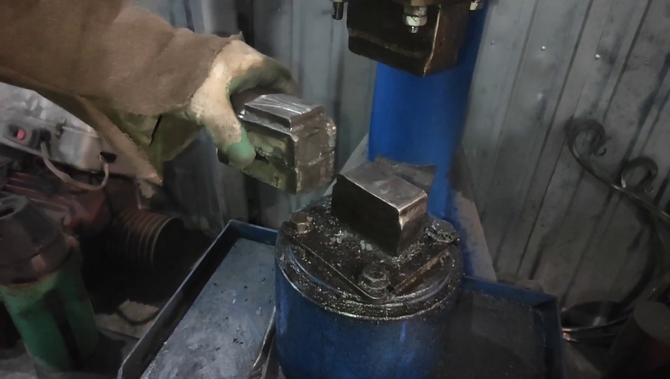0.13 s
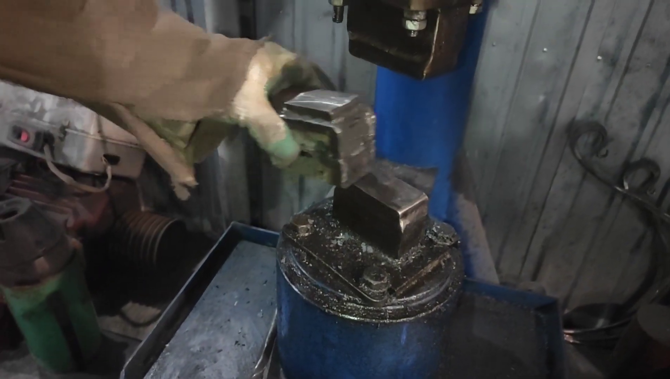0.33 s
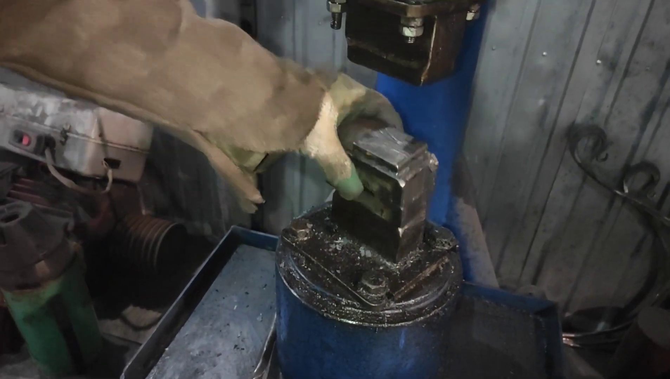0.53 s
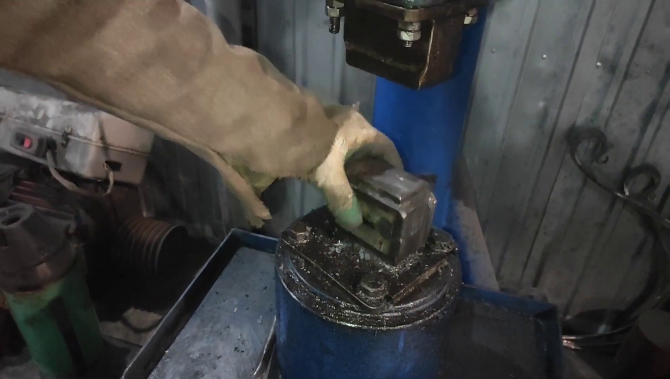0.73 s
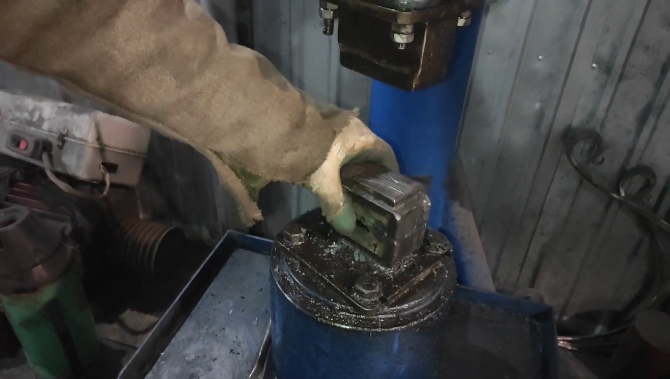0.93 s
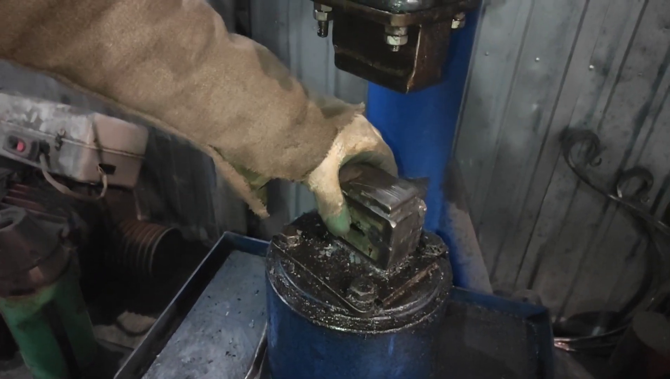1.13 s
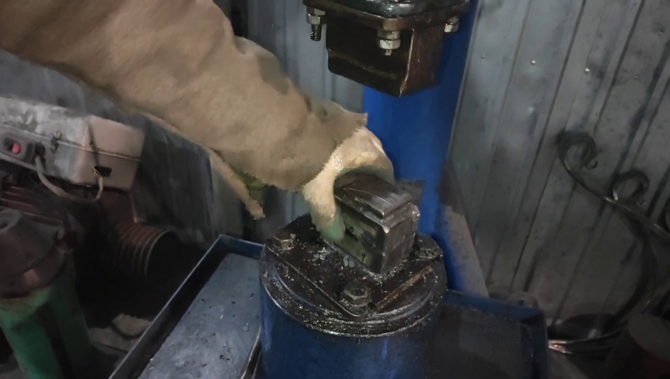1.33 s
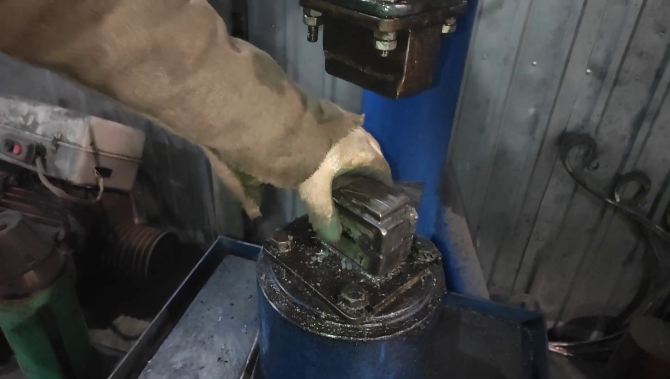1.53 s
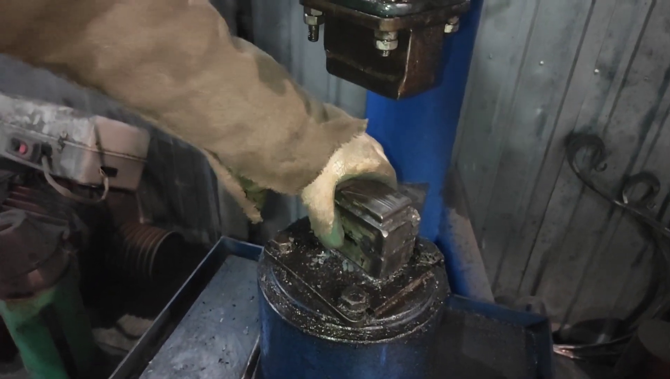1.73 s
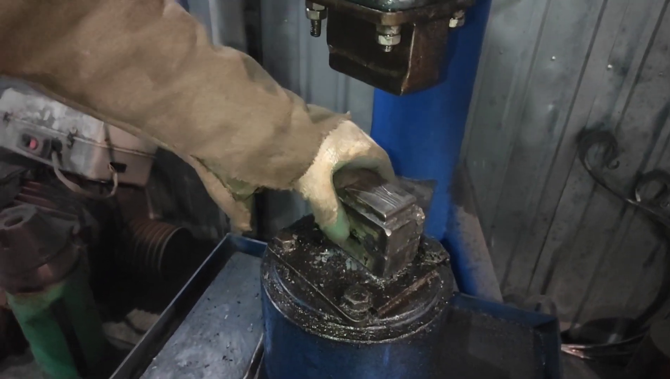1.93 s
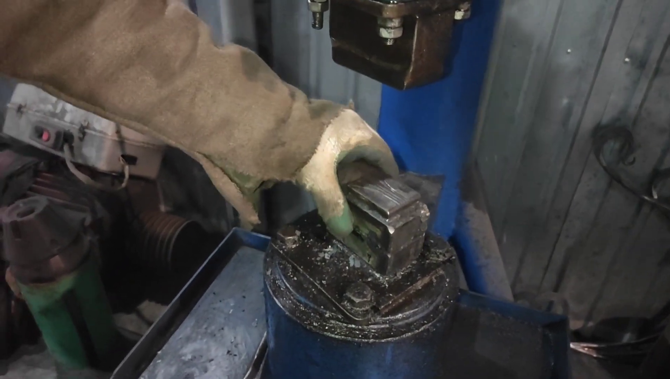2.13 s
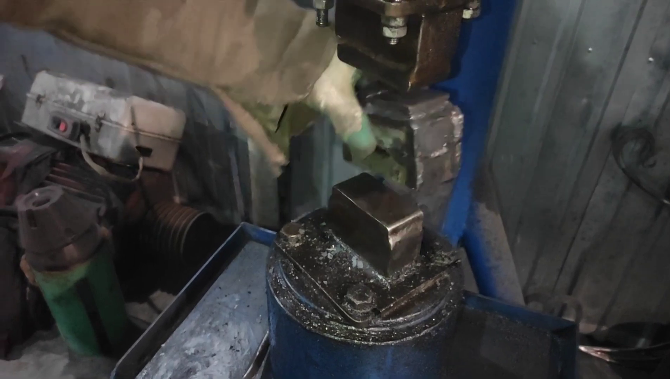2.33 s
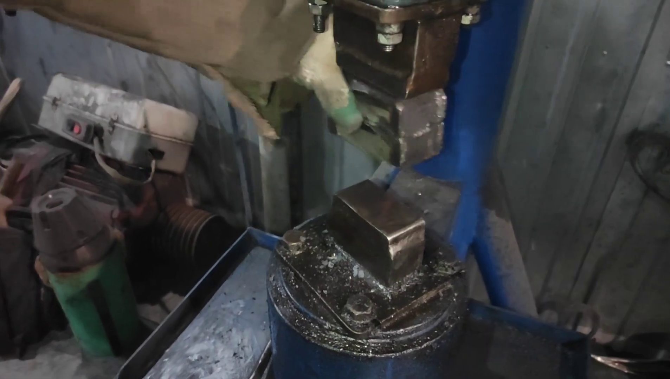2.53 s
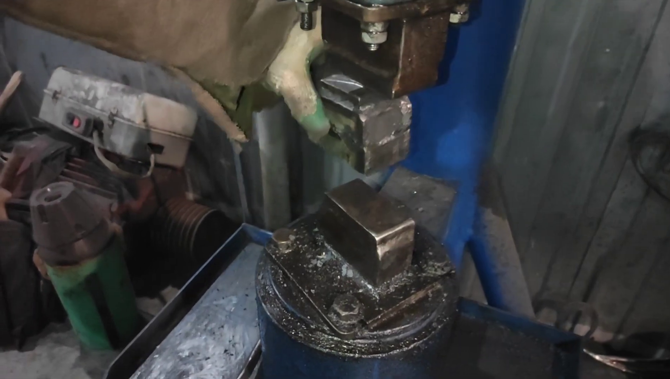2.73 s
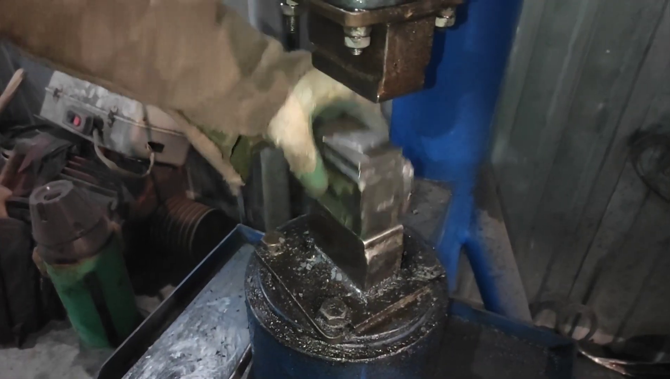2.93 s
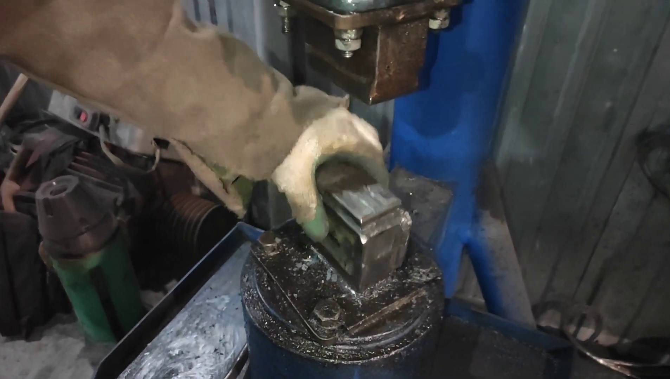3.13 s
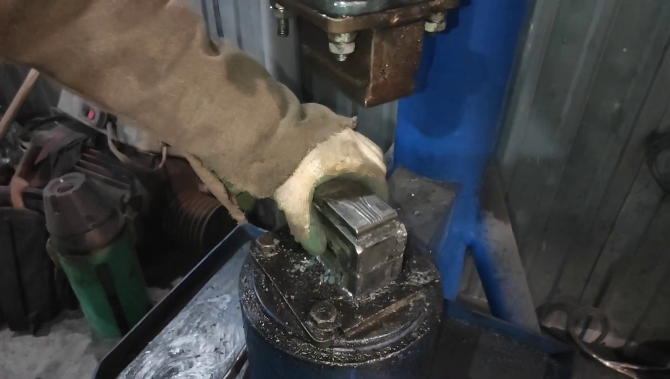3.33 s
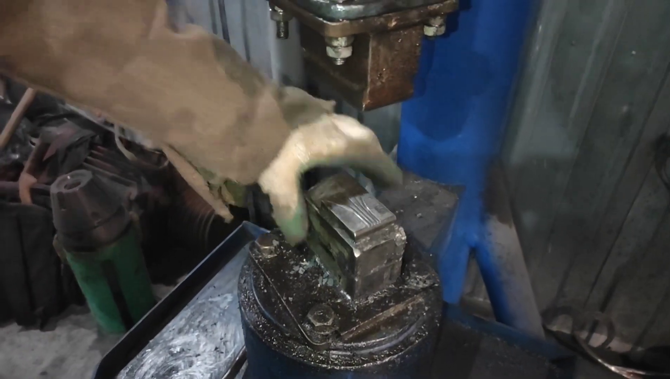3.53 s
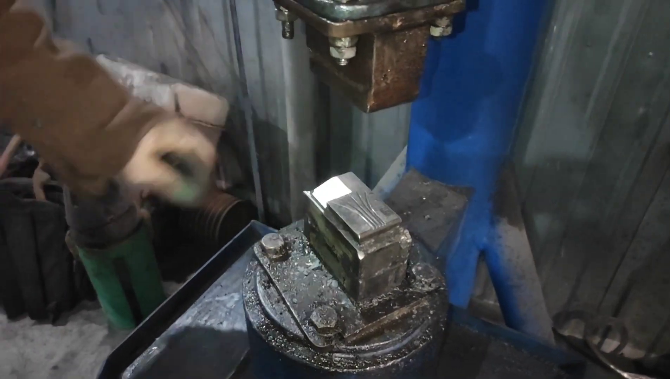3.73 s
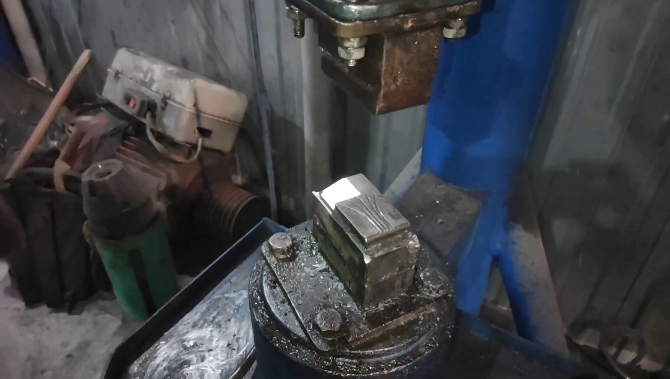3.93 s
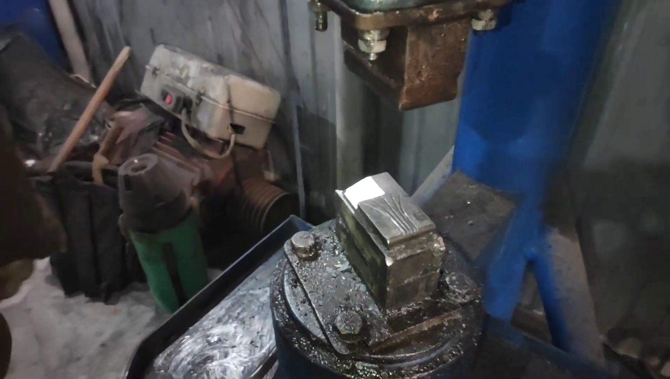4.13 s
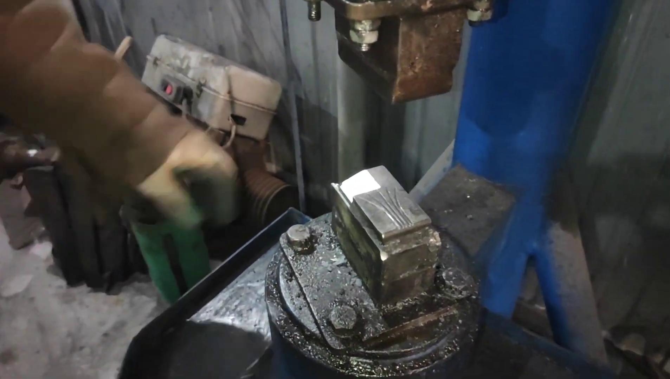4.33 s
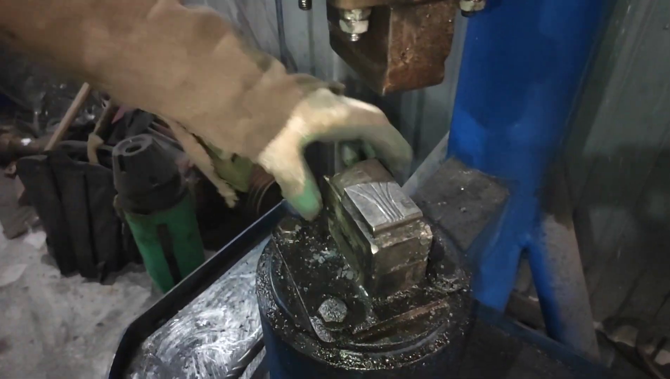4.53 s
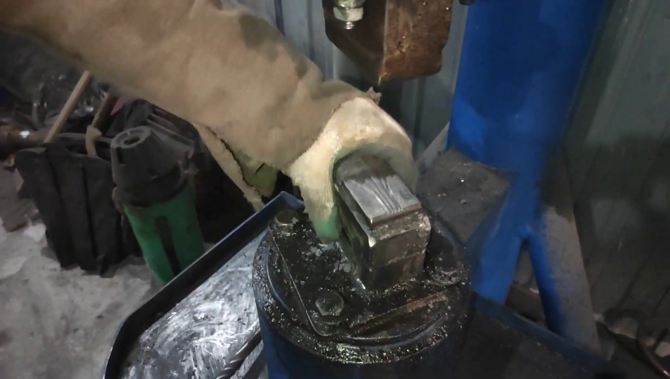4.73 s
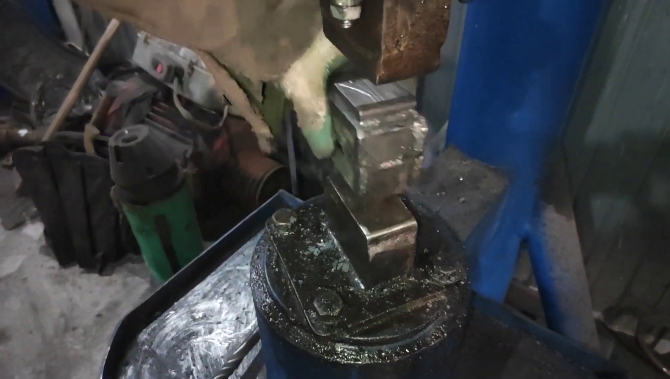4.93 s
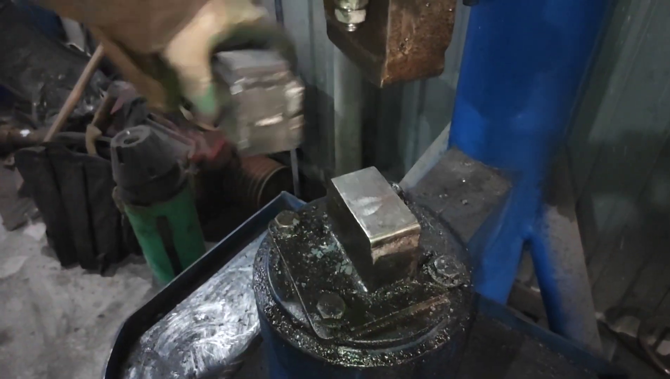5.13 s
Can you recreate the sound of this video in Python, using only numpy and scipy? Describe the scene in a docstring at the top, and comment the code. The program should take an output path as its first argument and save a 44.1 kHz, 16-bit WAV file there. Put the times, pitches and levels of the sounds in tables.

```python
"""Steel block on a forging die

A gloved hand sets a heavy steel block on the die of a forging hammer, shifts it, drags it off, sets it
down again with three clanks and pulls it away. Knocks and clanks are decaying modes of block, anvil and
die; slides pass bursts of tiny catches through those of block and anvil. Light ticks, some perhaps from
clothes or shoes, fall between. A sheet-metal workshop answers with decaying noise, over a faint wavering
hum, a low rumble and the filtered noise of a sleeve and a glove."""
import sys
import numpy as np
from scipy import signal
from scipy.fft import rfft, irfft
from scipy.io import wavfile
from scipy.ndimage import uniform_filter1d, minimum_filter1d

SR = 44100
rng = np.random.default_rng(int(sys.argv[2]) if len(sys.argv) > 2 else 0)


def inscribe(sig):
    """Save sig as 16-bit PCM at rate SR to the path in sys.argv[1].

    A 1-D sig is mono; a 2-D sig holds one channel per row.
    Samples are clipped to [-1, 1] before scaling.
    """
    pcm = np.round(np.clip(np.atleast_2d(sig).T, -1, 1) * 32767)
    wavfile.write(sys.argv[1], SR, pcm.astype(np.int16))


N = 228471
RING_SIZE = 2 ** 14  # samples that one ring lasts

# Low rumble of the shop. Each row: frequency in Hz, relative level in dB.
SHOP_SPECTRUM = [(25, 1.5), (60, -11.5), (130, -8), (200, -3), (300, -12.5), (600, -16), (1000, -21),
                 (1600, -25), (3500, -32.5), (5000, -30), (6800, -26.5), (9000, -31), (15000, -45.5)]
# Hum that fades and comes back. Each row: time in seconds, level in dB.
HUM_LEVEL = [(0, -59), (1.3, -69), (1.65, -77.5), (3.8, -78), (4.8, -64), (5.18, -91)]
HUM_HZ = 188.4  # mean pitch
# Rustle of the sleeve over time. Each row: time in seconds, level in dB.
SLEEVE_LEVEL = [(0, -107), (.6, -79.5), (1.45, -66.5), (2.75, -74), (3.65, -63), (4.7, -66.5), (5.18, -71)]
# Spectrum of the sleeve. Each row: frequency in Hz, relative level in dB.
CLOTH_SPECTRUM = [(100, -5), (400, 4.5), (900, -4.5), (2000, 1), (3700, -10), (5000, -6.5), (6900, 1.5),
                  (8600, -6.5), (10500, -20), (15000, -39)]
# Spectrum of the glove. Each row: frequency in Hz, relative level in dB.
GLOVE_SPECTRUM = [(300, -14), (1800, -6.5), (4000, -10.5), (6000, -7.5), (7500, 0), (10000, 3),
                  (15000, -43)]
# The glove tightens on the block. Each row: start in seconds, length in seconds, starting level in dB.
GRIPS = [(1.935, 0.13, -59.5), (4.732, 0.13, -46)]
GRIP_FADE_DB = 14  # the brushing dies down as the fingers come to rest
# Decay of the workshop. Each row: frequency in Hz, t60 in seconds.
ROOM_T60 = [(100, 0.27), (400, 0.84), (900, 0.61), (2000, 0.64), (4000, 0.57), (7500, 0.23), (14000, 0.47)]
# Colour of the reverberant sound. Each row: frequency in Hz, relative level in dB.
ROOM_COLOUR = [(100, 2.5), (200, 12.5), (450, -3), (900, -0.5), (1500, -4.5), (2400, -1.5), (3300, -4.5),
               (4500, -3.5), (7500, -3), (14000, -4)]

# Modes of the block. Each row: frequency in Hz, relative level in dB, t60 in seconds.
BLOCK_MODES = [(1316, -8, 0.045), (1410, -4.5, 0.09), (1673, -14.5, 0.05), (1730, -11.5, 0.065),
               (1824, -3.5, 0.066), (1945, -10.5, .05), (2056, -13, 0.05), (2203, -16.5, 0.098),
               (2420, -17, 0.2), (3584, -11.5, 0.035), (3670, -10.5, 0.079), (4266, -10.5, 0.04),
               (4430, -10.5, 0.04), (4900, -18.5, 0.051), (5260, -14.5, 0.05), (6810, -15.5, 0.035),
               (6970, -16, 0.045), (7740, -16, 0.05), (8130, -11.5, 0.042)]
# Modes of the anvil. Each row: frequency in Hz, relative level in dB, t60 in seconds.
ANVIL_MODES = [(359.6, -18, 0.15), (437, -17, 0.13), (504, -18, 0.036), (585.8, -17, 0.33),
               (795, -16.5, 0.029), (885, -12.5, 0.11), (1030, -6.5, 0.33), (1110, -16.5, 0.05),
               (1145, -18.5, 0.12)]
# Modes of the die with the block seated on it. Each row: frequency in Hz, relative level in dB,
# t60 in seconds.
DIE_MODES = [(912, 2, .28), (930, -6.5, .15), (1008, -4, 0.27), (1136, -6.5, .18), (1760, -8, 0.22),
             (1980, -10, 0.23), (2173, -4.5, 0.29), (2427, 0, 0.25), (2597, -8, 0.17), (4038, -10.5, .1),
             (4700, -4.5, 0.11), (5300, -6, 0.071), (7230, -8.5, .05)]
# Heavily damped modes while two faces press together. Each row: ratio to the pitch of the knock,
# relative level in dB, t60 in seconds.
KNOCK_MODES = [(0.84, -6, 0.016), (0.999, 1, 0.017), (1.17, -7, 0.013)]
# Spectrum of the clatter of clamped steel. Each row: frequency in Hz, relative level in dB.
CLATTER_SPECTRUM = [(60, -34), (150, -14.5), (260, -26), (420, -5.5), (640, -13.5), (900, 3), (1500, 0.5),
                    (2350, -1.5), (3100, -5), (3650, -1.5), (4050, -6), (4600, -4.5), (5200, -4.5),
                    (6000, -10), (7300, 0.5), (8600, -10), (10000, -21.5), (15000, -39.5)]
# Spectrum of gritty slip. Each row: frequency in Hz, relative level in dB.
GRIT_SPECTRUM = [(80, -26), (250, -39.5), (750, -14.5), (1800, -12), (2700, -12.5), (3200, -9.5),
                 (3600, -4.5), (4000, -19.5), (4400, 2.5), (4850, -3), (5250, 0.5), (5900, -9), (6900, 2),
                 (8300, -3), (10000, -14), (14000, -28.5)]
# Spectrum of low grinding. Each row: frequency in Hz, relative level in dB.
GRIND_SPECTRUM = [(40, -23), (130, -5), (200, 2), (280, -3), (470, 2), (620, -7.5), (820, -1.5),
                  (1050, 5.5), (1300, -4.5), (2500, -11.5), (6000, -21.5)]

# Dull, soft bumps. Each row: start in seconds, relative level in dB, pitch in Hz, t60 in seconds,
# relative width of the resonance.
BUMPS = [(0.903, -48.5, 213, 0.12, 0.26), (1.244, -53.5, 194, 0.046, 0.14), (1.328, -51.5, 232, 0.18, 0.91),
         (1.402, -48.5, 1130, 0.08, 0.057), (3.112, -47, 215, 0.14, 0.35), (3.873, -58.5, 412, 0.054, 0.2),
         (4.198, -60, 81, 0.17, 0.2)]
# Tiny squeaks as the block is nudged. Each row: start in seconds, length in seconds, mean pitch in Hz,
# level in dB.
SQUEAKS = [(1.304, 0.016, 5350, -52), (1.321, 0.0081, 3630, -52), (1.322, .008, 6730, -50),
           (1.375, .015, 3600, -55), (1.381, 0.014, 4380, -46)]
# Pushes that slip the block over the die. Each row: start in seconds, length in seconds, relative level
# at full speed in dB, weight on the die in dB, ring of the block in dB.
SLIDES = [(0.762, 0.13, -35, 1, -1), (0.87, 0.05, -28.5, -3, -4), (1.197, 0.044, -41, 1, -2),
          (1.294, 0.046, -46, 1, -17), (1.367, 0.041, -38, -4, -2.5), (1.389, 0.13, -53.5, -1, -23),
          (1.681, 0.12, -55.5, 3, 1.5), (2.152, 0.047, -54, 0.5, -8), (2.326, 0.051, -34.5, 5, -3),
          (2.364, 0.051, -27.5, -5, -2), (3.156, 0.093, -29, -7.5, -9.5), (3.24, 0.086, -32, -5, -4),
          (4.874, 0.061, -33, 0.5, -5), (4.927, 0.034, -27, -4, -2.5), (4.951, 0.036, -27.5, -8, -0.5),
          (4.972, 0.051, -36.5, -13, 1.5)]
GATHER_DB = 5  # a slide grows this much louder as it gathers speed
GRIND_LAG_S = 0.013  # the low grinding sets in after the grit
# burrs that catch and snap free among the fine grit; the rate is one over the median interval
SNAG_PER_S, SNAG_DB, SNAG_SCATTER_DB = 260, -9, -0.5
# A corner snaps off an edge. Each row: start in seconds, relative level in dB.
SNAPS = [(.839, -25), (0.845, -24.5), (1.23, -26), (1.306, -38), (1.3939, -29.5), (2.292, -31.5),
         (2.43, -15.5), (4.978, -28.5)]
# Light ticks and taps, some perhaps from clothes or shoes. Each row: start in seconds, relative level
# in dB, treble cut-off in Hz.
TICKS = [(1.229, -45, 9420), (1.432, -38, 9000), (1.91, -49, 2000), (2.527, -37, 15600),
         (2.713, -42.5, 3000), (2.834, -47, 4840), (2.934, -51, 3000), (2.998, -43.5, 9000),
         (3.822, -42.5, 2540), (3.967, -36.5, 2040), (4.093, -45, 2603), (4.201, -41.5, 2470),
         (4.254, -42, 2846), (4.434, -43.5, 4520), (4.587, -42.5, 4540), (5.011, -35, 8070)]
TICK_T60_S, TICK_RISE_S = 0.15, 0.00044
# Knocks and clanks of the block, with one likely early echo at 3.32 s. Each row: start in seconds,
# relative level in dB, treble cut-off in Hz, t60 of the clatter in seconds, pitch of the knock in Hz,
# level of the knock in dB, ring of the block in dB, ring of the anvil in dB, ring of the die in dB,
# left minus right in dB.
CLANKS = [(0.6854, -3.5, 3000, 0.16, 1370, -1, 4, -5, -26, -1.5),
          (0.7013, -4.5, 2000, 0.16, 932, -1, 4, -3.5, -22, 3.5),
          (0.759, -17, 1500, .07, 950, -1, -0.5, -10, -22, -0.5),
          (0.774, -20, 2200, .07, 1400, -12, 5, -10.5, -7.5, -2),
          (0.8225, -22, 2200, .06, 1420, -2, 2.5, -8, -24, -2.5),
          (1.333, -38, 400, .03, 1100, 6, -18, 9, -25, 0),
          (1.744, -38, 3000, 0.081, 1304, -3, -14, -12, -18, 2),
          (2.355, -14, 611, 0.012, 750, -3.5, -21, -5, -23, 0.5),
          (2.407, -22, 2313, 0.011, 873, -3, -5.5, -6.5, -23.5, -4),
          (3.0981, 3.5, 5504, 0.029, 1488, -1.5, -1.5, -8, -29.5, 5),
          (3.1074, 0, 1500, 0.052, 1716, -0.5, -6.5, -3.5, -20.5, 4),
          (3.2126, 4, 1604, .012, 1824, 1.5, -17.5, -19.5, -27, -1.5),
          (3.2152, -2, 8930, .015, 831, -3, -11.5, -18, -21, -2),
          (3.2245, -2.5, 779, .012, 1060, 3.5, -18.5, -8.5, -19.5, 0.5),
          (3.3104, 7, 11000, .015, 1196, -6, -16.5, -27.5, -21, 1.5),
          (3.3169, -4.5, 1500, 0.032, 1100, -3, -16, -19.5, -14.5, 1),
          (3.3207, -6.5, 3000, 0.026, 2340, 2, -17.5, -16, -21.5, 3),
          (3.8706, -27.5, 1472, 0.034, 793, -4.5, -16, -9, -24, 2.5),
          (4.907, -23.5, 1000, .04, 940, -12, -2, 2, -12, 0.5),
          (4.945, -21, 900, 0.013, 774, -1, -25, -12, -25, -2),
          (4.975, -34, 6000, 0.029, 1360, 4.5, -12, -15, -20, -8)]

# The two microphone ports. Each row: frequency in Hz, left minus right in dB.
PORTS = [(40, 1), (130, 4.5), (450, 3.5), (900, 1), (1400, -4), (2400, 0), (4500, -2), (7000, -9),
         (8400, -3), (12000, -3)]
# Treble of the microphone. Each row: frequency in Hz, gain in dB.
TREBLE = [(8500, -1), (9800, -10), (13000, -2.5), (15500, -5)]
TOP_HZ = 15550  # upper band limit


def undb(db):
    """Logarithmic level: decibels to gain."""
    return 10 ** (np.asarray(db) / 20)


def curve(rows):
    """Envelope: gain over time, interpolated in decibels."""
    return undb(np.interp(np.arange(N) / SR, *np.transpose(rows)))


def freqs(size):
    """Discrete spectrum: frequencies of the bins of a transform, at least 1 Hz."""
    return np.maximum(np.fft.rfftfreq(size, 1 / SR), 1)


def along(points, hz):
    """Logarithmic frequency axis: a table is interpolated along it."""
    f, v = np.transpose(points)
    return np.interp(np.log(hz), np.log(f), v)


def colour(x, points):
    """Minimum-phase filtering: folding the cepstrum makes a given response causal."""
    size = 2 ** 12
    cepstrum = irfft(np.log(undb(along(points, freqs(size)))))
    cepstrum[1:size // 2] *= 2
    cepstrum[size // 2 + 1:] = 0
    impulse = irfft(np.exp(rfft(cepstrum)))
    return signal.oaconvolve(x, impulse[None], axes=1)[:, :x.shape[1]]


def even(x, hz):
    """Spectral whitening: a causal filter evens out a burst's energy, smoothed over the given width."""
    size = x.shape[1]
    spectrum = rfft(x)
    smooth_power = uniform_filter1d(abs(spectrum) ** 2, max(int(hz * size / SR), 2), axis=1)
    cepstrum = irfft(-np.log(smooth_power))
    cepstrum[:, 0] /= 2
    cepstrum[:, size // 2:] = 0
    return irfft(spectrum * np.exp(rfft(cepstrum)))


def highpass(x, hz):
    """First-order filtering: the bass falls 6 dB an octave."""
    return signal.sosfilt(signal.butter(1, hz, "high", fs=SR, output="sos"), x)


def unit(x):
    """Energy normalization: a mean of one per channel."""
    return x / np.sqrt(np.sum(x ** 2) / 2)


def pair(size, alike_hz=1500):
    """Spatial coherence: noise at two close ports is alike in the bass, unrelated in the treble."""
    mid, side = rfft(rng.standard_normal((2, size)))
    alike = 1 / (1 + (freqs(size) / alike_hz) ** 2)
    mid = mid * np.sqrt((1 + alike) / 2)
    side = side * np.sqrt((1 - alike) / 2)
    return irfft(np.array([mid + side, mid - side]), size)


def hiss(points):
    """Stationary random noise: coloured, of rms one."""
    return unit(colour(pair(N), points)) * np.sqrt(N)


def walk(rate):
    """Slow random modulation: normal draws, rate of them a second, joined by straight lines."""
    steps = rng.standard_normal(2 ** 12)
    return np.interp(np.arange(N) / SR * rate, np.arange(len(steps)), steps)


def fade(t60, size):
    """Linear damping: exponential decay by 60 dB in t60."""
    return np.exp(-np.log(1000) * np.arange(size) / SR / t60)


def stroke(length, edge=0.65):
    """Gradual loading: a push swells, holds and lets go."""
    return signal.windows.tukey(int(length * SR), min(edge, 1))[None]


def add(out, x, s):
    """Superposition: a sound is mixed in at a given time."""
    i = int(s * SR)
    out[:, i:i + x.shape[1]] += x[:, :N - i]


def background(shop_db=-66, waver_hz=1.0, flutter_db=1):
    """Steady sources: a far machine hums with a wavering tone over the low noise of the shop."""
    phase = 2 * np.pi * np.cumsum(HUM_HZ + waver_hz * walk(23)) / SR
    hum = np.sqrt(2) * np.sin(phase)
    rumble = unit(colour(pair(N, alike_hz=500), SHOP_SPECTRUM)) * np.sqrt(N)
    return hum * curve(HUM_LEVEL) * undb(flutter_db * walk(35)) + undb(shop_db) * rumble


def clothes(crease_db=2):
    """Friction noise of fibres: the sleeve rustles in creases; the glove brushes the block as it grips."""
    out, glove = hiss(CLOTH_SPECTRUM) * curve(SLEEVE_LEVEL), hiss(GLOVE_SPECTRUM)
    for s, length, db in GRIPS:
        brush = stroke(length, edge=0.8)
        brush = brush * undb(db - np.linspace(0, GRIP_FADE_DB, brush.size))
        add(out, brush * glove[:, int(s * SR):][:, :brush.size], s)
    return out * undb(crease_db * walk(61))


def workshop(x, wet_db=-8, first_s=0.012, build_s=0.003, even_hz=45):
    """Reverberation: echoes from metal walls thicken into a tail, each octave at its own decay rate."""
    noise, tail = rfft(pair(SR, alike_hz=800)), 0
    octaves = np.log2(np.clip(freqs(SR), 125, 16000) / 125)
    for k in range(8):
        band = irfft(noise * np.maximum(1 - abs(octaves - k), 0), SR)
        tail = tail + band * fade(along(ROOM_T60, 125 * 2 ** k), SR)
    onset = np.clip((np.arange(SR) / SR - first_s) / build_s, 0, 1)
    tail = even(tail * onset, even_hz)
    return undb(wet_db) * signal.oaconvolve(x, colour(unit(tail), ROOM_COLOUR), axes=1)[:, :N]


def ring(modes, scatter=0.0042, spread_hz=2800, uneven_db=0.5):
    """Modal superposition: decaying modes start in alternate directions, never excited quite alike."""
    t, out = np.arange(RING_SIZE) / SR, 0
    for k, (hz, db, t60) in enumerate(modes):
        detune, skew, strength = rng.standard_normal(3)
        # higher modes reach the two ports more out of step
        phase = np.array([[.5], [-.5]]) * skew * hz / spread_hz
        tone = np.cos(2 * np.pi * hz * (1 + scatter * detune) * t + phase)
        out = out + (-1) ** k * undb(db + uneven_db * strength) * unit(fade(t60, RING_SIZE) * tone)
    return out


def clatter(t60, even_hz=350):
    """High modal density: crowded, damped modes of clamped steel amount to decaying noise."""
    burst = pair(RING_SIZE, alike_hz=2270) * fade(t60, RING_SIZE)
    return unit(colour(even(burst, even_hz), CLATTER_SPECTRUM))


def soften(x, hz, rise_s=0.0011):
    """Contact time: a flat, slow contact pushes longer than a sharp corner and so loses treble."""
    # the ring takes a moment to build
    rise = np.sin(np.pi / 2 * np.minimum(np.arange(RING_SIZE) / SR / rise_s, 1)) ** 2
    lowpass = signal.butter(1, min(hz, SR / 2 - SR / 20), fs=SR, output="sos")
    return signal.sosfilt(lowpass, x * rise)


def bumps(bump_db=30):
    """Single resonance: each soft push is a decaying burst through one band."""
    out = np.zeros((2, N))
    for s, db, hz, t60, width in BUMPS:
        band = [hz / (1 + width), hz * (1 + width)]
        body = signal.butter(2, band, "band", fs=SR, output="sos")
        burst = pair(RING_SIZE) * fade(t60, RING_SIZE)
        add(out, undb(db + bump_db) * unit(signal.sosfilt(body, burst)), s)
    return out


def squeaks(waver=0.013):
    """Periodic stick-slip: under the hand the faces slip in step for a moment and chirp."""
    out, wobble = np.zeros((2, N)), walk(700)
    for s, length, hz, db in SQUEAKS:
        push = stroke(length, edge=0.94)
        pitch = hz * (1 + waver * wobble[int(s * SR):][:push.size])
        tone = np.sin(2 * np.pi * np.cumsum(pitch) / SR)
        add(out, undb(db) * np.sqrt(2) * push * tone, s)
    return out


def snags():
    """Irregular stick-slip: sharp single slips at uneven intervals, rms one."""
    wait, size = rng.standard_normal((2 ** 13, 2)).T
    at = (np.cumsum(np.exp(wait / 2)) * SR / SNAG_PER_S).astype(int)
    strength = undb(SNAG_SCATTER_DB * np.clip(size, -2, 1.5))
    out = np.bincount(at[at < N], strength[at < N], N)
    return out / np.sqrt(np.mean(out ** 2))


def slip_force(catch_rate, scatter_db, fine_db):
    """Rough-surface friction: noise follows dense random catches, with coarser snags among them."""
    caught = rng.random(N) < catch_rate / SR
    catches = caught * undb(scatter_db * np.minimum(rng.exponential(size=N), 4))
    pressure = signal.lfilter([1], [1, -np.exp(-catch_rate / SR)], catches ** 2) + 1e-9
    # the hand keeps the average push steady while single catches come and go
    steady = np.sqrt(pressure / uniform_filter1d(pressure, size=800))
    return undb(fine_db) * pair(N) * steady + undb(SNAG_DB) * snags()


def slides(catch_rate=1100, scatter_db=2, fine_db=-2, grit_db=-2, grind_db=-9, block_db=1.0,
           anvil_db=-6, sharp_hz=5000, shift=.007):
    """Source and resonator: slip forces excite gritty faces and block; weight adds low grinding and anvil."""
    force = slip_force(catch_rate, scatter_db, fine_db)
    click = np.ones((2, 1)) * signal.unit_impulse(RING_SIZE)
    grit = undb(grit_db) * unit(colour(click, GRIT_SPECTRUM))
    grind = undb(grind_db) * unit(colour(click, GRIND_SPECTRUM))
    out = np.zeros((2, N))
    for s, length, db, weight_db, ring_db in SLIDES:
        speed, load = stroke(length, edge=0.65), stroke(length, edge=0.9)
        speed = speed * undb(np.linspace(-GATHER_DB, 0, speed.size))
        # tiny, sharp catches favour the block's high modes; each new grip shifts them a little
        block = highpass(ring(BLOCK_MODES, scatter=shift), sharp_hz)
        bright = grit + undb(block_db + ring_db) * block
        low = undb(weight_db) * (grind + undb(anvil_db) * ring(ANVIL_MODES))
        for start, push, body in [(s, speed, bright), (s + GRIND_LAG_S, load, low)]:
            slip = push * force[:, int(start * SR):][:, :push.size]
            add(out, undb(db) * signal.fftconvolve(slip, body, axes=1), start)
    return out


def snaps(snap_db=15, thin_hz=3600, t60=0.014, block_db=-6):
    """Impulsive excitation: a corner leaves an edge so briefly that mainly the treble rings."""
    out = np.zeros((2, N))
    for s, db in SNAPS:
        body = clatter(t60) + undb(block_db) * ring(BLOCK_MODES)
        add(out, undb(db + snap_db) * highpass(highpass(body, thin_hz), thin_hz), s)
    return out


def ticks(level_db=13, ring_db=-14, tick_db=-2, tick_t60=.014):
    """Weak excitation: light ticks and taps clatter on a little, with barely any ring of the anvil."""
    out, anvil = np.zeros((2, N)), undb(ring_db) * ring(ANVIL_MODES)
    for s, db, hz in TICKS:
        body = undb(tick_db) * clatter(tick_t60) + clatter(TICK_T60_S) + anvil
        add(out, undb(db + level_db) * soften(body, hz, rise_s=TICK_RISE_S), s)
    return out


def clanks(force_db=15):
    """Coupled bodies: each knock, clank or likely echo sums a knock, a clatter and three ringing bodies."""
    out = np.zeros((2, N))
    for s, db, hz, t60, knock_hz, knock_db, block_db, anvil_db, die_db, pan_db in CLANKS:
        # how the faces meet sets the pitch of the knock
        knock = [(ratio * knock_hz, level, decay) for ratio, level, decay in KNOCK_MODES]
        body = clatter(t60) + undb(knock_db) * ring(knock, spread_hz=7500)
        # the block rings freely only while it rocks, so its share differs from row to row
        body += undb(block_db) * ring(BLOCK_MODES)
        body += undb(anvil_db) * ring(ANVIL_MODES)
        body += undb(die_db) * ring(DIE_MODES)
        port_db = np.array([[pan_db], [-pan_db]]) / 2
        add(out, undb(db + force_db + port_db) * soften(body, hz), s)
    return out


def scene():
    """Time difference of arrival: steel a little to the right; then room, clothes and background."""
    # compact bodies move little air in the bass
    struck = highpass(highpass(clanks() + ticks(), hz=190), hz=148)
    steel = struck + snaps() + squeaks() + slides() + bumps()
    lag = 5  # samples by which these sounds reach the left port later
    steel = np.array([np.pad(steel[0], (lag, 0))[:N], steel[1]])
    return steel + workshop(steel) + clothes() + background()


def limiter(x, ceiling_db=-1.7, size=20):
    """Gain control: the highest peaks are turned down for a moment."""
    peak = np.maximum(abs(x).max(axis=0), 1e-9)
    gain = np.minimum(1, undb(min(ceiling_db, 0)) / peak)
    held = minimum_filter1d(gain, 2 * size)
    return x * uniform_filter1d(uniform_filter1d(held, size), size)


def record(dry):
    """Transducer response: each port has its colour; treble drops, peaks are limited, the top is cut."""
    left = colour(dry[:1], [(hz, db / 2) for hz, db in PORTS])
    right = colour(dry[1:], [(hz, -db / 2) for hz, db in PORTS])
    sound = limiter(colour(np.vstack([left, right]), TREBLE))
    return signal.sosfilt(signal.ellip(12, .2, 70, TOP_HZ, fs=SR, output="sos"), sound)


dry = scene()
out = record(dry)
inscribe(out)
```